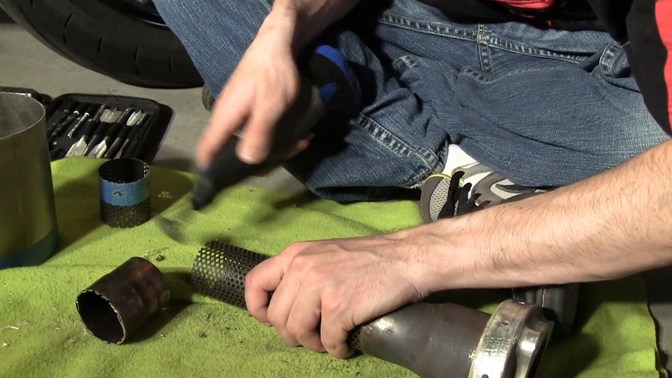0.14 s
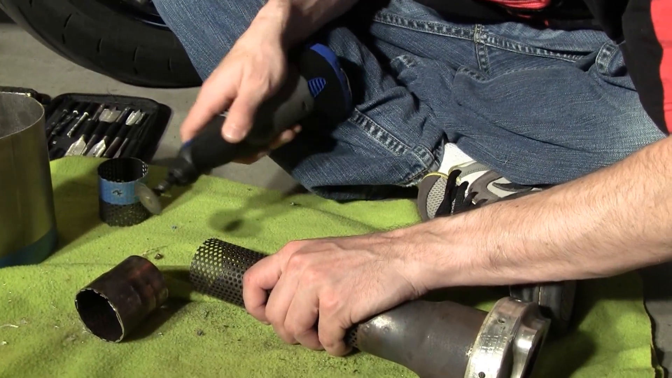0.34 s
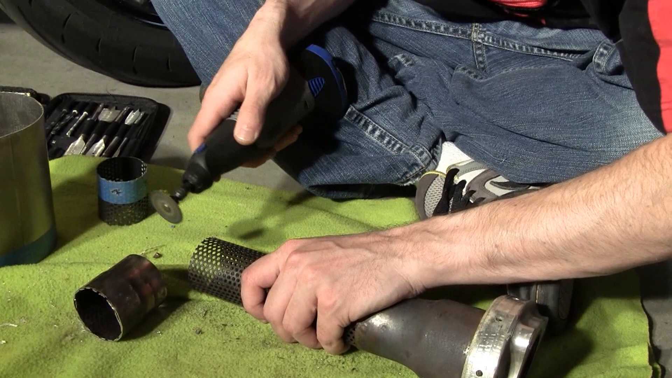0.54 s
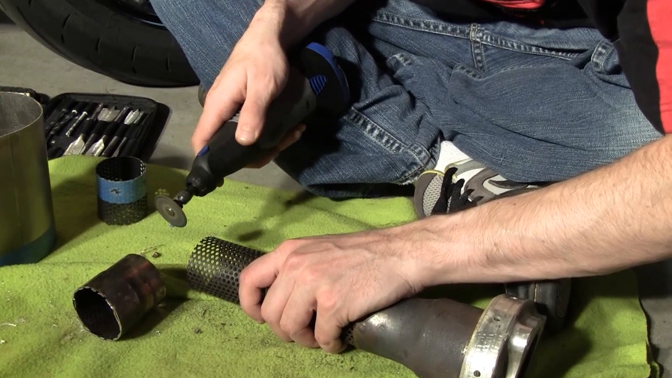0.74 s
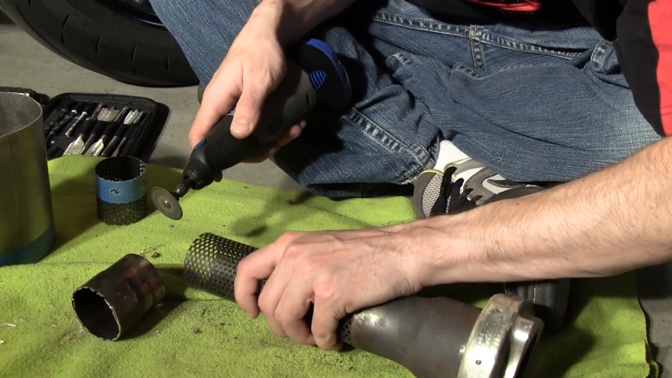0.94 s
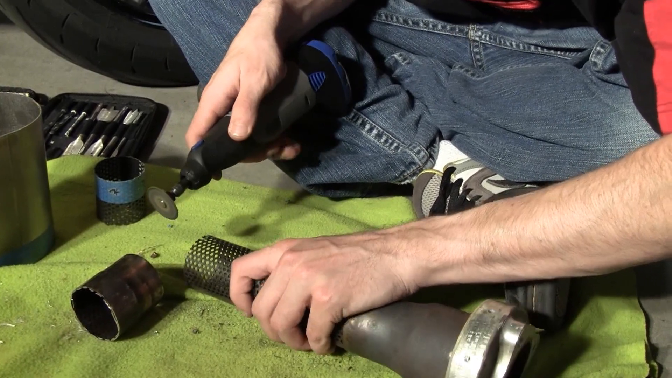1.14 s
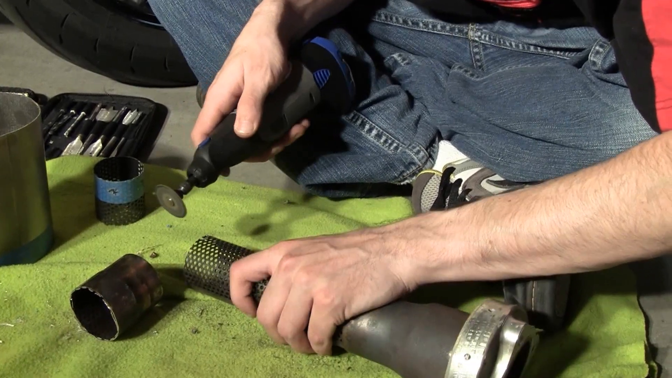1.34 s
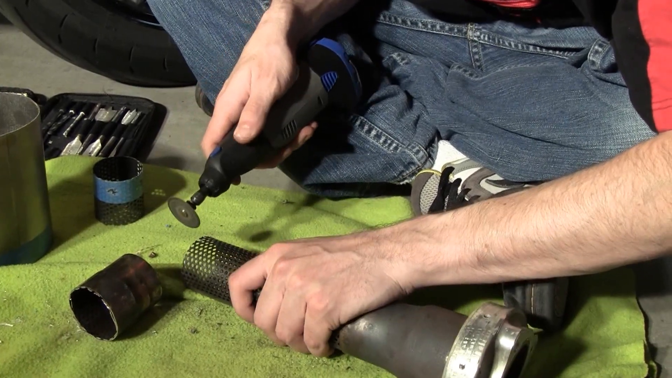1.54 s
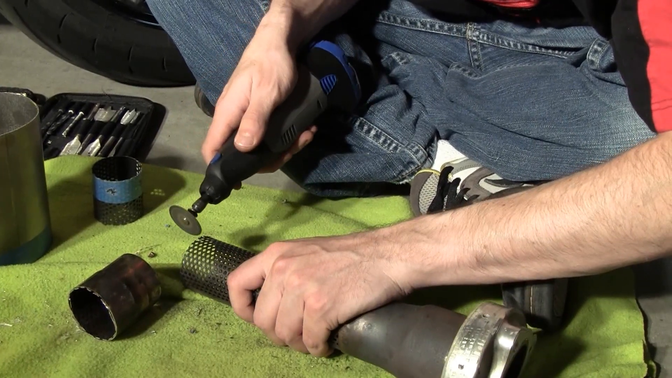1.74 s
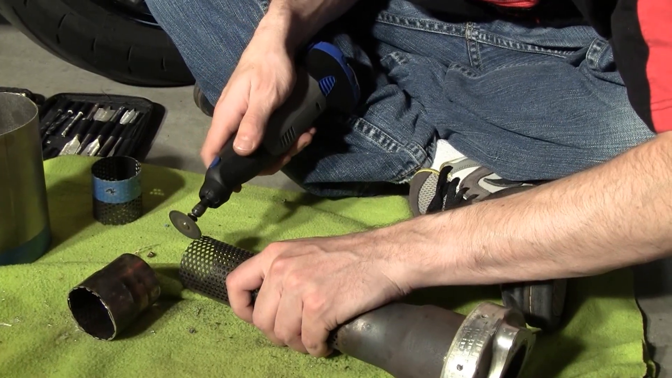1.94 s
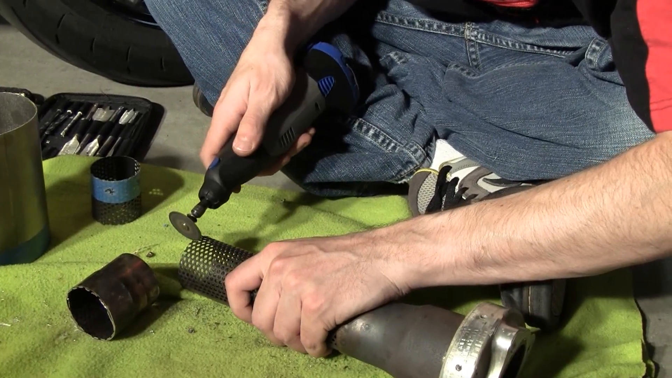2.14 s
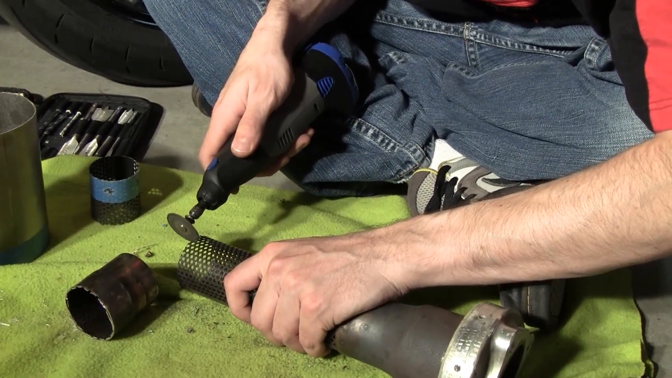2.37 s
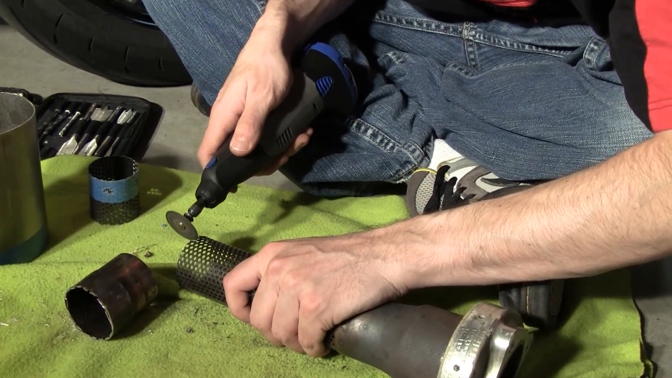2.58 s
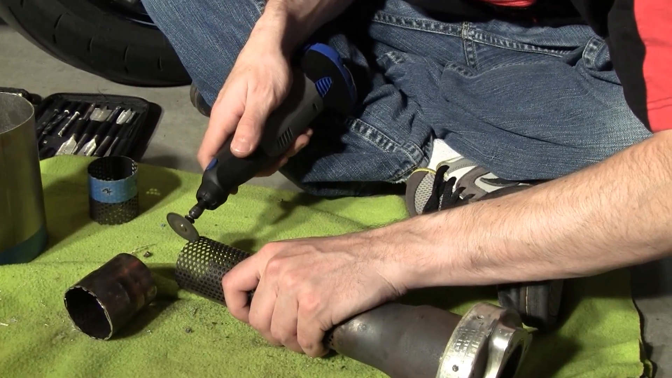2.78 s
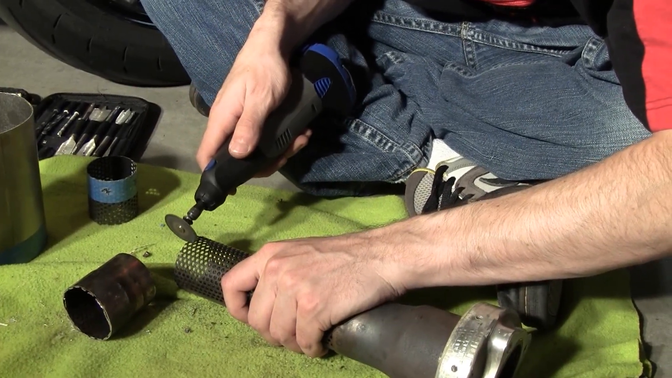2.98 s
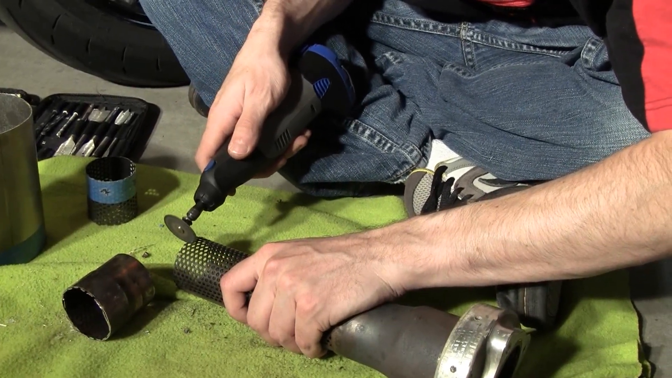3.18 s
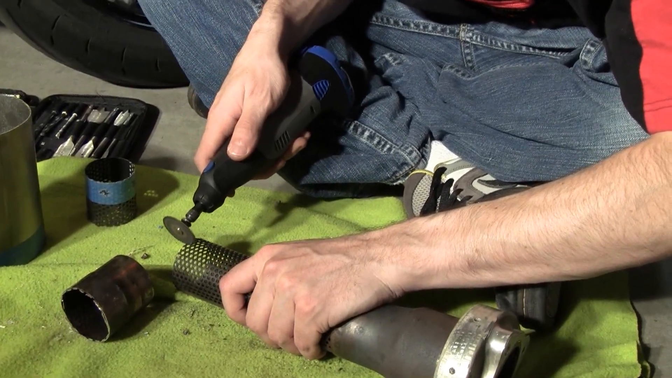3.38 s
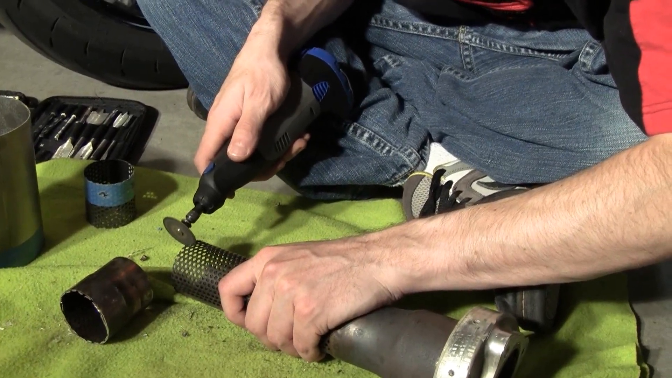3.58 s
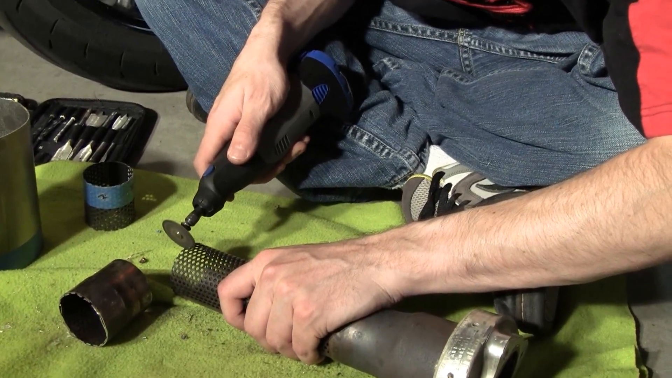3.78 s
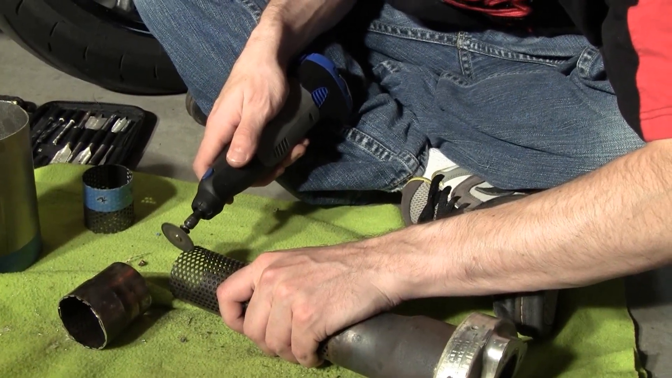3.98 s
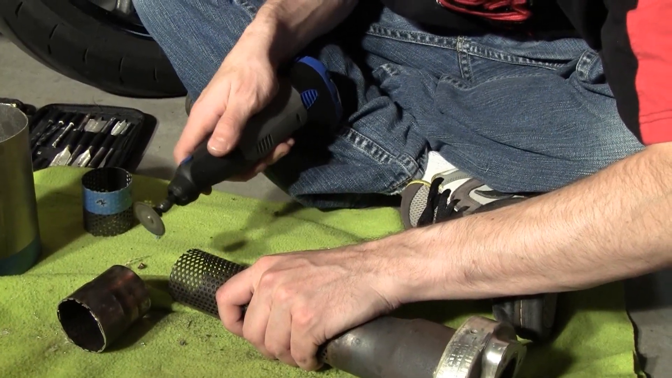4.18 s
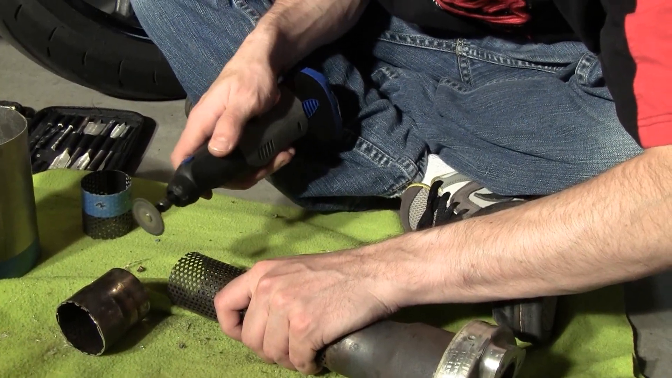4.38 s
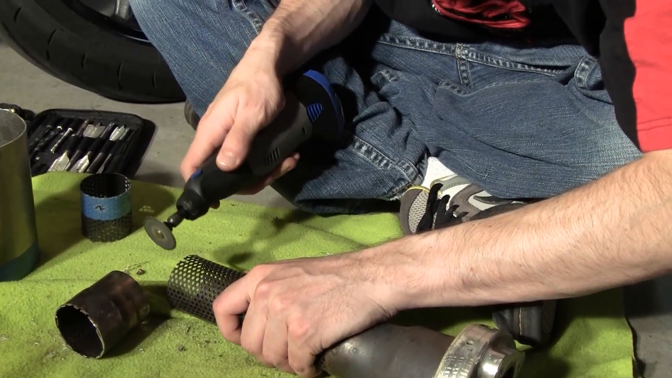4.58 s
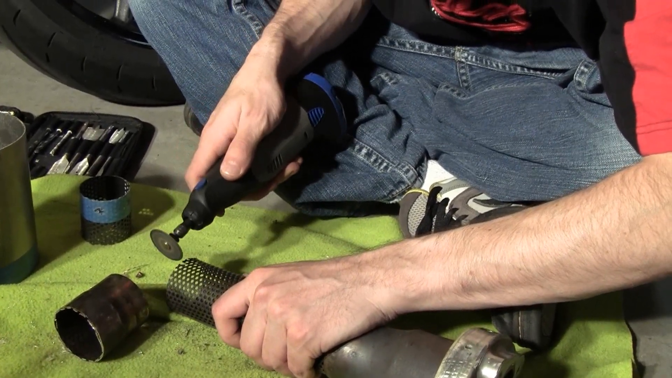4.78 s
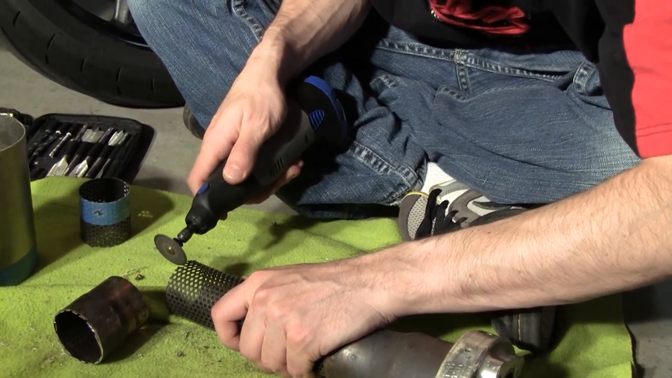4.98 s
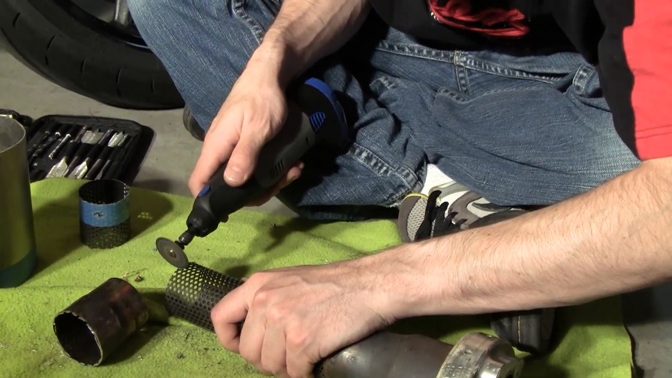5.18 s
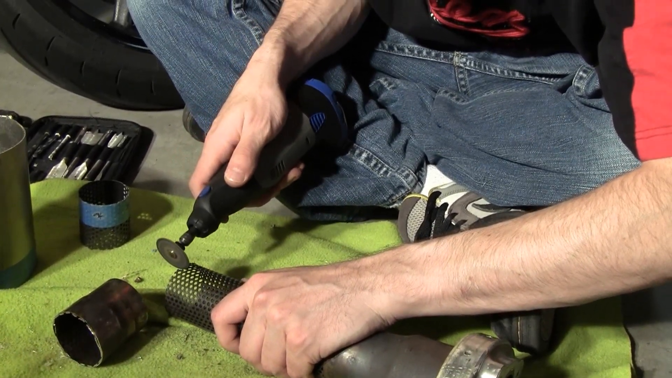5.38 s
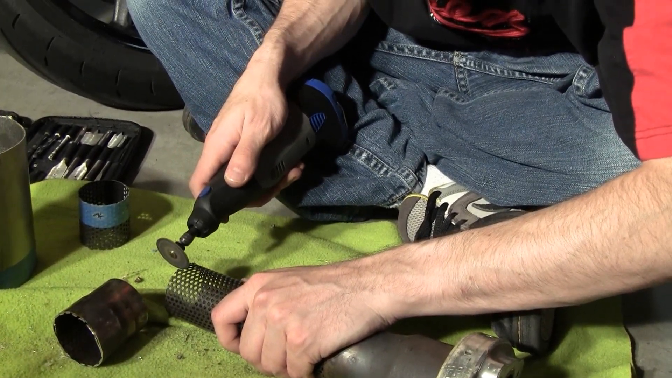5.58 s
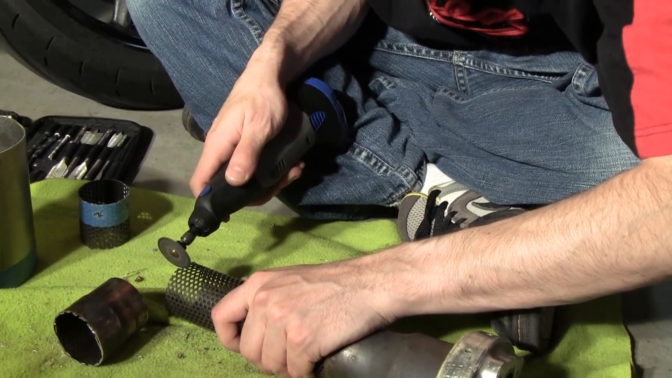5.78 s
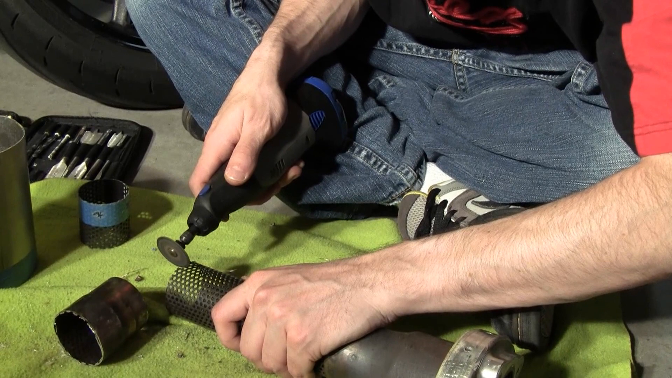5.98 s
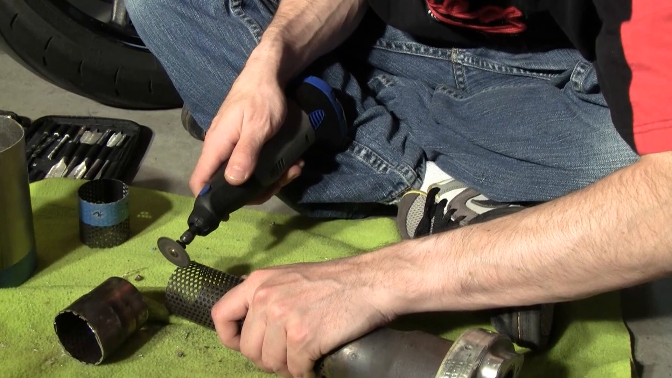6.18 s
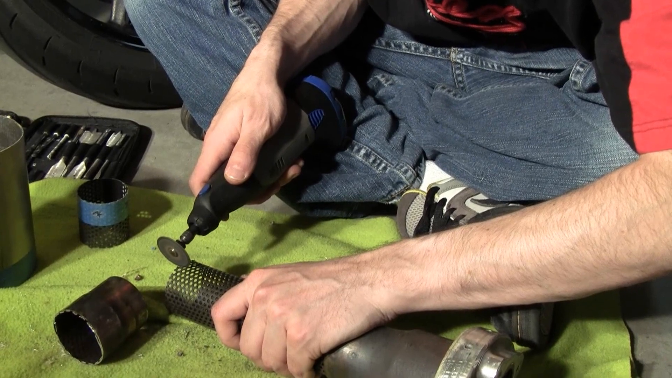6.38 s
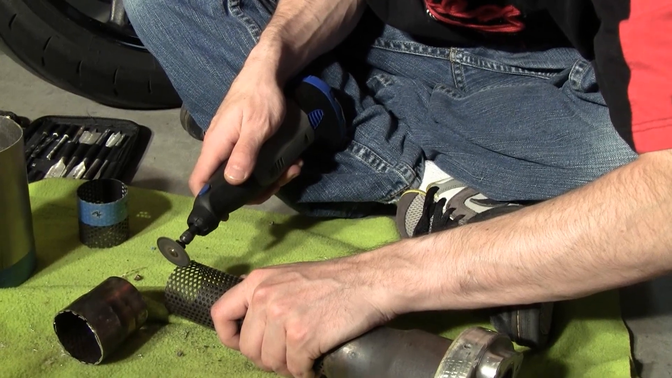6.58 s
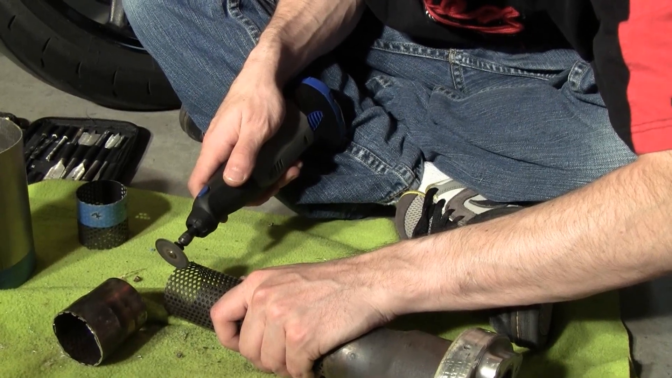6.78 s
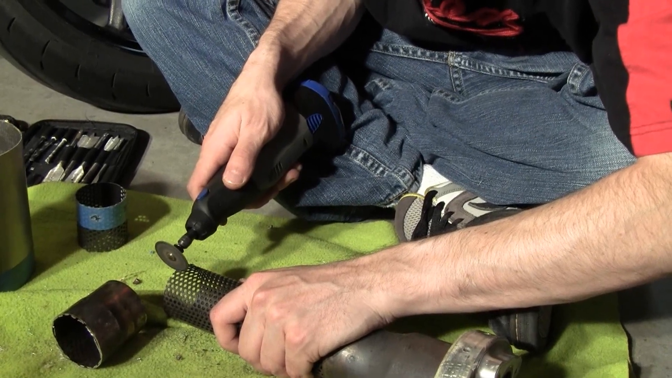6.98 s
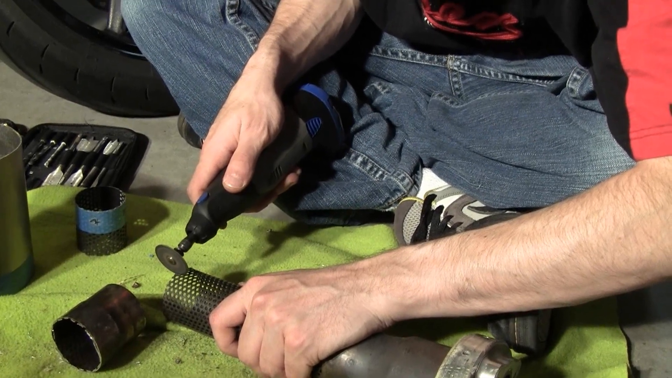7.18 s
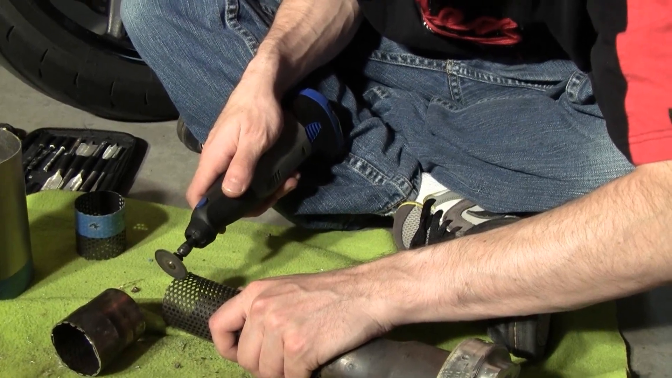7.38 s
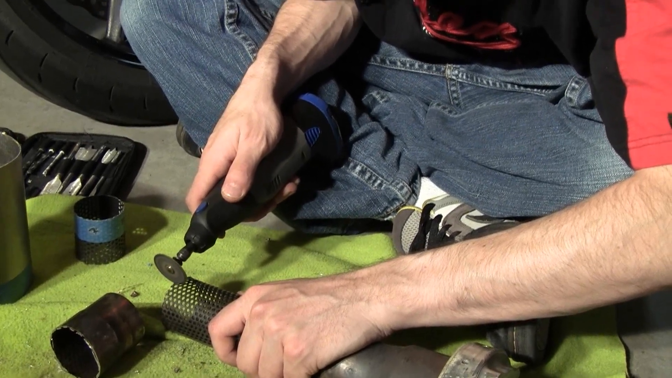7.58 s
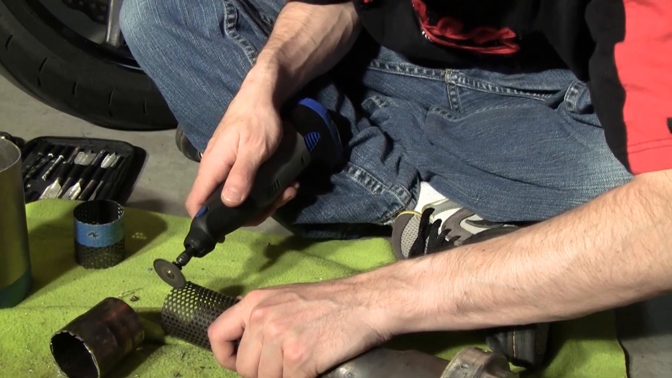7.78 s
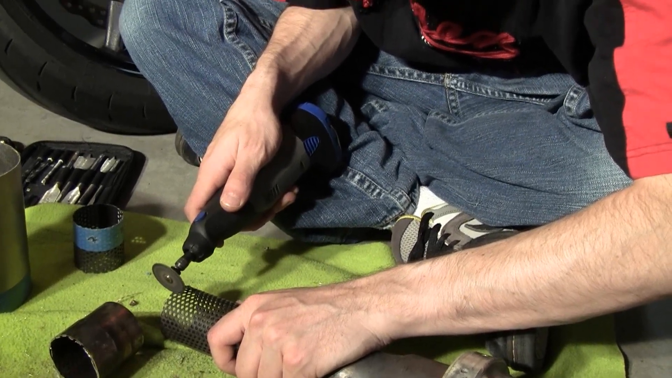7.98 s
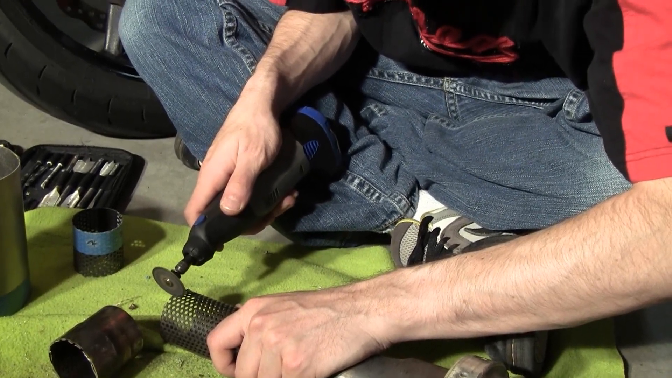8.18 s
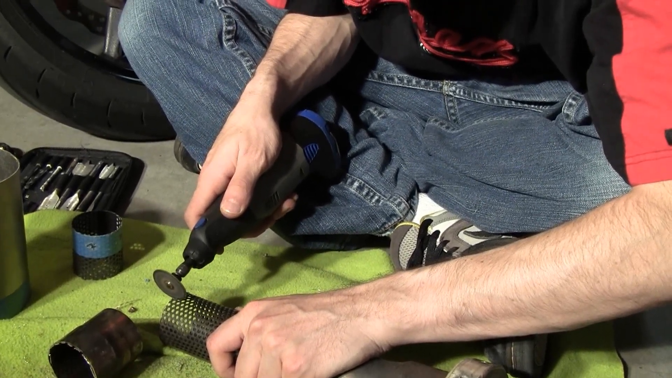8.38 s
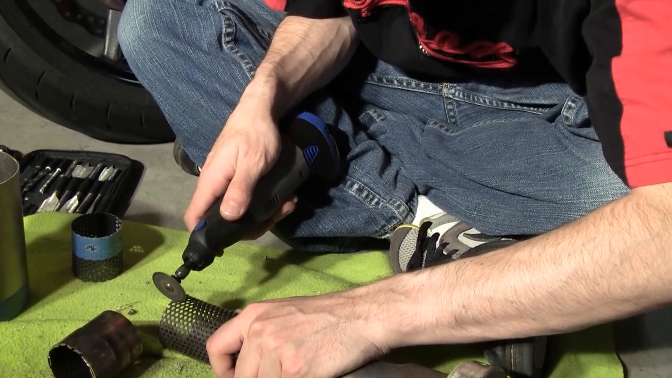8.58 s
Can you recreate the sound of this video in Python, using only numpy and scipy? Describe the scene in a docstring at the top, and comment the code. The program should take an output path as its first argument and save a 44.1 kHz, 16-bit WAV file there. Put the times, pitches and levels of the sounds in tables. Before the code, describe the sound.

A handheld rotary tool snaps on and races up to a steady, buzzy whine with rushing air. Its wheel cuts into a steel exhaust pipe twice: first the motor bogs abruptly, with fluttering gritty chatter and short screeches, then recovers. The second cut begins as a ringing skim and sinks gradually into coarse, hissing rasp, still going at the end. Close and dry, with slight garage reflections.

```python
"""Rotary tool cutting a steel pipe

A handheld rotary tool is switched on in a garage, spins up and twice cuts an exhaust pipe with an abrasive wheel.
The motor whines on multiples of its shaft speed, which sags during each cut and climbs between them.
Grit on the rim excites the pipe's resonances in nearly the same pattern on every turn;
deep in the cut, random forces replace much of that pattern and the sound turns to a rasp."""
import sys
import numpy as np
from scipy import signal
from scipy.fft import rfft, irfft, next_fast_len
from scipy.io import wavfile
from scipy.ndimage import uniform_filter1d

SR = 44100
rng = np.random.default_rng(int(sys.argv[2]) if len(sys.argv) > 2 else 0)


def store_wav(level_fs):
    """Save 16-bit WAV to argv[1]."""
    pcm = np.round(np.clip(np.atleast_2d(level_fs), -1, 1) * 32767)
    wavfile.write(sys.argv[1], SR, pcm.T.astype(np.int16))


N = 380583
TIME = np.arange(N) / SR

# spectrum of the garage air: (frequency [Hz], relative level [dB per Hz])
AMBIENCE = [(30, -33), (100, -6), (250, 2), (500, 0), (1000, -3.5), (2000, -10), (4000, -18), (8000, -29),
            (13000, -20), (15000, -50)]
# background hum, before its share of the level curve: (frequency [Hz], level [dB])
HUM = [(120, -52), (278, -43), (774, -51.5), (1243, -55)]
# thin high chirps before the motor starts: (time [s], length [s], frequency [Hz], level of the fundamental [dB])
CHIRPS = [(0.0, 0.06, 4135, -54), (0.072, .17, 4140, -53), (0.151, 0.049, 4255, -42.5)]
# level curve that turns both motor and background hum down during the cuts: (time [s], level [dB])
LEVEL_CURVE = [(.7, -6), (1.0, -3), (1.55, -4), (2.1, -6), (2.35, -15.5), (2.62, -28.5), (2.95, -13.5),
               (3.25, -21.5), (3.6, -18.5), (4.15, -16.5), (4.62, -2.5), (5.15, -4.5), (5.35, -13),
               (5.65, -8.5), (5.8, -16.5), (6.3, -20), (6.85, -21.5), (7.05, -24.5), (8.63, -23)]
# the power switch: (time [s], overall level [dB])
SWITCH = (.2555, -22)
# modes the switch strikes: (frequency [Hz], relative level [dB], 60 dB decay time [s])
SWITCH_MODES = [(800, 0.5, 0.0295), (1640, -3, 0.03), (3830, -19, 0.0166), (6000, -12, 0.0125),
                (8200, -6, .008), (10300, 6, 0.0076)]

FULL_SPEED = 356  # turns per s
# the freed motor runs up: (time [s], starting speed [turns per s], speed approached [turns per s])
RUN_UPS = [(.2555, 123.2, 357.2), (4.16, 209.9, 353.2)]
# time constant of the last stretch [s], and how much air drag steepens the first
SPIN_UP_S, AIR_DRAG = .319, .92
# the shaft bogs down in the first and the second cut: (time [s], speed [turns per s])
FIRST_SAG = [(2.15, 357.4), (2.37, 337.1), (2.41, 300.8), (2.48, 283.3), (2.56, 185.6), (2.61, 187.0),
             (2.66, 165.3), (2.74, 217.5), (2.77, 229.5), (2.83, 232.0), (2.94, 258.3), (3.0, 260.1),
             (3.07, 252.9), (3.12, 223.1), (3.25, 185.3), (3.38, 188.2), (3.47, 206.8), (3.53, 195.2),
             (3.6, 207.5), (3.66, 197.1), (3.73, 210.3), (3.79, 198.5), (4.1, 198.2), (4.16, 210.6)]
SECOND_SAG = [(5.19, 349.1), (5.28, 345.8), (5.41, 325.1), (5.65, 329.7), (5.85, 300.5), (6.07, 294.7),
              (6.21, 260.9), (6.41, 274.8), (6.52, 275.4), (6.69, 241.6), (6.82, 235.1), (7.03, 200.5),
              (7.24, 205.5), (7.34, 194.1), (7.37, 202.1), (7.55, 185.0), (7.8, 181.9), (7.87, 192.8),
              (8.01, 191.2), (8.05, 183.1), (8.12, 195.9), (8.31, 178.3), (8.38, 187.5), (8.47, 173.5),
              (8.54, 172.6), (8.63, 179.4)]

# the motor's voices: (level at full speed [dB], slope [dB per octave of speed], share of the level curve)
UNBALANCE_LAW = (-23.5, 10.5, 0.81)
WHINE_LAW = (-14.5, 6.5, 0.93)
AIR_LAW = (-17, 16, 0.84)
# the unbalance hum cancels at one speed: (speed [turns per s], width [turns per s], loss [dB])
HUM_NULL = (339, 7, 16)
# shaft multiples from fan blades and commutator: (multiple, relative level [dB])
WHINE = [(1, -2), (2, -4), (3, 0), (4, 4), (5, -1), (6, 1.5), (7, -5.5), (8, -3.5), (9, -0.5), (10, -4.5),
         (11, -4), (12, -4.5), (13, -6.5), (14, -10.5), (15, -1), (16, -9.5), (17, -13), (18, -2),
         (19, -7.5), (20, -3), (21, -9), (22, -3.5), (23, -1.5), (24, -2), (25, -15.5), (26, -5),
         (27, -8.5), (28, -8.5)]
# resonances of the plastic housing: (frequency [Hz], width [Hz], boost or cut [dB])
HOUSING = [(852, 114, 10.5), (925, 26, -0.5), (1045, 15, 8), (1370, 16, 7), (1843, 14, 10), (1985, 18, 2),
           (2108, 5.3, -4), (2390, 33, 7.5), (2853, 17, 6), (2980, 630, 7.5), (2973, 19, -1.5),
           (3910, 210, 8.5), (4460, 22, 13), (4760, 310, 15.5), (6400, 100, 7)]
WHINE_ATTACK_S = 0.11  # the whine builds up this long after the switch
# cooling air and brush hiss: (frequency [Hz], relative level [dB per Hz])
AIR = [(40, -28), (100, -15.5), (280, -4.5), (470, -13), (800, -4.5), (1500, -1), (3000, 0), (4600, 4.5),
       (6000, 1), (8000, 0.5), (11000, -3.5), (13500, -17.5), (15500, -33)]

# wheel on the pipe: (start [s], end [s], grinding level [dB], base pipe ring relative to it [dB],
# least roughness [0-1])
CUTS = [(2.152, 4.155, -17.5, -8, .22), (5.204, 8.7, -18, -8, .02)]
# resonances of the steel pipe and wheel: (frequency [Hz], nominal width [Hz], relative level [dB])
PIPE = [(410, 42, -17), (810, 180, -12), (1350, 550, -12), (1746, 334, -4.5), (2710, 630, -10.5),
        (3332, 230, -7.5), (4073, 295, -3), (4564, 335, 1.5), (5700, 530, -2.5), (7380, 590, 8.5),
        (8280, 1350, 7.5), (9600, 2100, 7), (11970, 1100, 2), (13040, 970, -3.5), (14530, 510, -4.5)]
# the hand eases off and the wheel nearly leaves the groove: (time [s], half length [s], loss [dB])
EASINGS = [(2.16, 0.042, 3.5), (2.294, 0.011, 4), (2.56, 0.038, 3), (2.734, 0.046, 7.5), (2.878, 0.054, 6),
           (3.137, 0.021, 0), (3.432, 0.034, 3), (3.642, 0.057, 1.5), (5.276, 0.021, 3), (5.45, 0.031, 6.5),
           (5.51, 0.023, 20), (5.67, .02, 2), (5.78, 0.024, 4), (5.904, 0.0084, 9), (6.246, 0.039, 5.5),
           (6.693, 0.082, 1.5), (7.36, 0.04, 3.5), (8.104, 0.022, 1.5)]
# chatter bursts, where the pipe's ring and the motor's whine stand out:
# (time [s], half length [s], nominal boost [dB])
CHATTER_BURSTS = [(2.41, 0.078, 4), (3.04, 0.059, 2), (3.48, 0.031, 7), (3.6, 0.032, 5), (3.72, 0.075, 4.5),
                  (3.99, 0.17, 5), (5.6, 0.031, 0.5), (5.95, 0.025, 9), (6.48, 0.094, 5), (6.85, .05, 6)]
# share of a burst's boost that reaches the pipe's ring and the whine
BURST_RING, BURST_WHINE = 0.43, 0.97
# the lower the speed in a cut, the more the wheel rasps: roughness [0-1] at half speed, power of the law
ROUGH_AT_HALF_SPEED, ROUGH_POWER = 0.69, 1
SKIM_SAG = 0.099  # up to this sag, as a share of full speed, the wheel only skims
# the pipe rings most under a firm, even bite: (sag [share of full speed], width [same], boost [dB])
FIRM_BITE = (0.3, 0.14, 3.85)
# mean level of the top sizzle, and its greatest spread as the wheel skims [dB]
SIZZLE_DB, SIZZLE_WANDER_DB = -5, 2.5
# a skimming wheel touches unevenly: greatest spread of its ring [dB], touches per s
STUTTER_DB, STUTTER_PER_S = 3.0, 28
GRAIN_MEMORY = .955  # share of the rim's grain pattern that survives a turn
# the pinched wheel screeches: (time [s], length [s], frequency [Hz], level [dB])
SCREECHES = [(2.403, .08, 8000, -31), (3.197, 0.23, 8650, -32.5), (5.66, 0.072, 8300, -24.5),
             (5.94, 0.13, 8450, -28)]
# the tool is brought back to the pipe: (time [s], level before the soft onset [dB], frequency [Hz],
# 60 dB decay time [s])
KNOCK = (5.113, -17, 820, .035)

# difference between the microphone ports: (frequency [Hz], nominal side minus mid [dB])
WIDTH = [(60, -15), (300, -11.5), (1000, -17), (2500, -25), (4500, -10), (6000, -14.5), (7500, -12.5),
         (10000, -2.5), (15000, -4)]
CUTOFF_HZ = 16000


def from_db(db):
    """Logarithmic level: decibels to amplitude gain."""
    return 10 ** (np.asarray(db) / 20)


def rms_one(x):
    """Power normalisation: scale to an rms of 1."""
    return x / np.sqrt(np.mean(x ** 2) + 1e-20)


def in_time(rows):
    """Linear interpolation: the columns of a curve table at every sample."""
    s, *columns = np.transpose(rows)
    return [np.interp(TIME, s, c) for c in columns]


def at_hz(points, hz):
    """Spectral envelope: gain of a table joined on a log-frequency axis."""
    f, db = np.transpose(points)
    return from_db(np.interp(np.log(hz), np.log(f), db))


def bell(x, centre, width):
    """Lorentzian resonance: power response, 1 on top and half at half a width to either side."""
    return 1 / (1 + (2 * (x - centre) / width) ** 2)


def colour(x, gain_at):
    """Linear filtering: multiply the spectrum of x by a gain given as a function of frequency."""
    size = next_fast_len(N + 2000, True)
    hz = np.maximum(np.fft.rfftfreq(size, 1 / SR), 1)
    return irfft(rfft(x, size) * gain_at(hz), size)[..., :N]


def gate(start, end, fade):
    """Amplitude envelope: 1 between two times, with straight fades outside them."""
    return np.clip(np.minimum(TIME - start, end - TIME) / fade + 1, 0, 1)


def swells(rows):
    """Gaussian envelopes: summed bumps in dB, one for each (time, half length, dB)."""
    return sum(db * np.exp(-((TIME - s) / length) ** 2) for s, length, db in rows)


def drift(rate):
    """Slow random modulation of rms 1: chance values joined at this rate, held after the last."""
    knots = rng.standard_normal(4000)
    return rms_one(np.interp(TIME * rate, np.arange(len(knots)), knots))


def per_turn(turns, memory, size=200):
    """Cyclic excitation of rms 1: a texture read round the shaft, each turn keeping a share of the last."""
    keep = np.clip(memory, 0, .998)
    fresh = rng.standard_normal((3200, size))
    # the first 400 turns let the texture settle
    texture = signal.lfilter([1], [1, -keep], fresh, axis=0)[400:].ravel()
    # read at twice the sample rate to limit aliasing
    place = np.interp(np.arange(2 * N) / 2, np.arange(N), turns) * size
    reading = np.interp(place, np.arange(len(texture)), texture)
    return rms_one(signal.resample_poly(reading, 1, 2))


def background():
    """Superposition: filtered noise for air, sines for hum, and chirps of three harmonics."""
    # the air sinks over two seconds from the switch
    air_db = -46 - 9 * np.clip((TIME - SWITCH[0]) / 2.0, 0, 1)
    air = from_db(air_db) * rms_one(colour(rng.standard_normal(N), lambda hz: at_hz(AMBIENCE, hz)))
    hum = sum(from_db(db) * np.sqrt(2) * np.sin(2 * np.pi * (hz * TIME + rng.random())) for hz, db in HUM)
    hum = hum * from_db(0.7 * in_time(LEVEL_CURVE)[0])
    chirps = 0
    for start, length, hz, db in CHIRPS:
        phase = 2 * np.pi * hz * TIME + 0.5 * drift(90)
        tone = np.sin(phase) + 0.16 * np.sin(2 * phase) + 0.21 * np.sin(3 * phase)
        chirps = chirps + from_db(db) * gate(start, start + length, fade=.004) * tone
    return air + hum + chirps


def switch(scrape_s=0.0081):
    """Impulsive excitation: the slide switch snaps over and the housing's modes decay freely."""
    start, level_db = SWITCH
    age = np.maximum(TIME - start, 0)
    modes = sum(from_db(db - 60 * age / t60) * np.sin(2 * np.pi * hz * age) for hz, db, t60 in SWITCH_MODES)
    scrape = colour(rng.standard_normal(N), lambda hz: bell(hz, 4300, 15000) * hz / (hz + 600))
    snap = from_db(-1.5) * (age > 0) * np.exp(-age / scrape_s) * scrape
    return from_db(level_db) * (modes + snap)


def shaft_speed():
    """Speed curve: a run-up law when freed, tabled speeds while cutting, corners smoothed."""
    speed = np.full(N, RUN_UPS[0][1])
    for (start, slow, top), sag in zip(RUN_UPS, (FIRST_SAG, SECOND_SAG)):
        left = np.exp(-np.maximum(TIME - start, 0) / SPIN_UP_S)
        free = top - (top - slow) * left / (1 + AIR_DRAG * (1 - slow / top) * (1 - left))
        from_start = np.where(TIME < sag[0][0], free, in_time(sag)[0])
        speed = np.where(TIME < start, speed, from_start)
    return uniform_filter1d(speed, size=900)


def voice_db(law, speed):
    """Power law of speed: level of one motor voice, plus its share of the level curve."""
    full_db, db_per_octave, share = law
    return full_db + db_per_octave * np.log2(speed / FULL_SPEED) + share * in_time(LEVEL_CURVE)[0]


def whine(turns, speed, flutter_rate=10, dulling_db=5.5, evenness=1.0, count=42):
    """Source and filter: shaft multiples glide through housing resonances; the sum is evened out to rms 1."""
    multiple, order_db = np.transpose(WHINE)
    coarse, speed = TIME[::32], speed[::32]
    # each multiple swells and fades at random, more at low speed
    flutter_db = 2.2 + 5 * np.maximum(1 - speed / FULL_SPEED, 0)
    out, power = 0, 0
    for k in range(2, count):
        boost_db = sum(db * bell(k * speed, centre, width) for centre, width, db in HOUSING)
        # a slow motor loses its high multiples first
        dull_db = dulling_db * np.log2(speed / FULL_SPEED) * max(k / 5 - 1, 0)
        place = coarse * flutter_rate + rng.random()
        wander = np.interp(place, np.arange(400), rng.standard_normal(400))
        # the highest multiples die away into the hiss
        fade_db = -.9 * max(k - len(WHINE), 0)
        base_db = np.interp(k, multiple, order_db)
        gain = from_db(base_db + boost_db + dull_db + fade_db + flutter_db * wander)
        out = out + np.interp(TIME, coarse, gain) * np.sin(2 * np.pi * (k * turns + rng.random()))
        power = power + gain ** 2 / 2
    return rms_one(out / np.interp(TIME, coarse, np.sqrt(power) ** evenness))


def brush_sparks(turns, speed):
    """Amplitude modulation: as the motor gains speed, brush noise sparks and rattles once a turn."""
    gain_in_speed = np.gradient(uniform_filter1d(speed, size=4000)) * SR / FULL_SPEED
    pull = np.clip(gain_in_speed, 0, 1) * speed / FULL_SPEED
    sparks = rng.standard_normal(N) * from_db(7 * np.cos(2 * np.pi * turns) + 3 * drift(120))
    response = lambda hz: (bell(hz, 1220, 660) + 0.3 * bell(hz, 4200, 6700)) * hz / (hz + 500)
    return from_db(-31.5) * pull * rms_one(colour(sparks, response))


def motor(turns, speed):
    """Rotating source: unbalance hum, whine, and a rush of air and brushes that grows steeply with speed."""
    null_hz, null_width, null_db = HUM_NULL
    hum_db = voice_db(UNBALANCE_LAW, speed) - null_db * bell(speed, null_hz, null_width)
    hum = from_db(hum_db) * np.sqrt(2) * np.sin(2 * np.pi * turns)
    # the rotor rattles in its bearings, more below full speed, and roughens the high multiples
    play = (.0025 + .015 * (1 - speed / FULL_SPEED)) * drift(400)
    attack = np.clip((TIME - SWITCH[0]) / WHINE_ATTACK_S, 0, 1) ** 2
    whine_db = voice_db(WHINE_LAW, speed) + BURST_WHINE * swells(CHATTER_BURSTS)
    tones = attack * from_db(whine_db) * whine(turns + play, speed)
    # the brushes scrape the same commutator bars on every turn
    rush = rng.standard_normal(N) + from_db(0.5) * per_turn(turns, memory=0.93)
    rush = rush * (1 + .6 * np.cos(2 * np.pi * turns)) * from_db(drift(40))
    air = from_db(voice_db(AIR_LAW, speed)) * rms_one(colour(rush, lambda hz: at_hz(AIR, hz)))
    air = air + brush_sparks(turns, speed)
    running = np.clip((TIME - SWITCH[0]) / 0.0041, 0, 1)
    return running * (np.sqrt(attack) * hum + tones + air)


def grit(turns, rough, runout_db=5.0, chatter_db=-1.0):
    """Contact force: a slowly wearing grain pattern plus fresh fractures, hardest once a turn by runout."""
    pattern = np.sqrt(1 - rough) * per_turn(turns, memory=GRAIN_MEMORY)
    fractures = np.sqrt(rough) * rng.standard_normal(N)
    runout = runout_db * (0.5 - 0.1 * rough) * np.cos(2 * np.pi * turns)
    # deep in the groove the wheel bounces unevenly
    chatter = chatter_db * np.sqrt(rough) * drift(650)
    pressure = from_db(runout + chatter)
    pressure = pressure / np.sqrt(uniform_filter1d(pressure ** 2, size=2000))
    return (pattern + fractures) * pressure * from_db(1.3 * drift(50))


def pipe_response(hz):
    """Modal superposition: the pipe's resonances added in power, with steep skirts."""
    return np.sqrt(sum(from_db(db) ** 2 * bell(hz, centre, 1.05 * width) ** 2 for centre, width, db in PIPE))


def screeches(force, width_hz=600):
    """Resonant response: one mode of the pinched wheel rings out above the rasp."""
    out = 0
    for start, length, centre, db in SCREECHES:
        mode = rms_one(colour(force, lambda hz: bell(hz, centre, width_hz)))
        out = out + from_db(db) * gate(start, start + length, fade=0.11) * mode
    return out


def grinding(turns, speed, ring_edge_hz=6700, sizzle_edge_hz=11100):
    """Forced vibration: grit drives a low ring, a rasp and a top sizzle, rougher as the speed sags."""
    sag = np.maximum(1 - speed / FULL_SPEED, 0)
    skimming = sum(share * gate(start, end, fade=.008) for start, end, _, _, share in CUTS)
    depth = np.maximum(sag - SKIM_SAG, 0) / (.5 - SKIM_SAG)
    digging = ROUGH_AT_HALF_SPEED * depth ** ROUGH_POWER
    rough = np.clip(np.maximum(skimming, digging), 0, .92)
    cutting = sum(from_db(db) * gate(start, end, fade=0.012) for start, end, db, _, _ in CUTS)
    contact = from_db(-swells(EASINGS)) * cutting
    firm_sag, firm_width, firm_db = FIRM_BITE
    ring_db = sum(db * gate(start, end, fade=0.0066) for start, end, _, db, _ in CUTS)
    ring_db = ring_db + firm_db * bell(sag, firm_sag, firm_width) + BURST_RING * swells(CHATTER_BURSTS)
    ring_db = ring_db + STUTTER_DB * (1 - rough) ** 2 * drift(STUTTER_PER_S)
    sizzle_db = SIZZLE_DB + SIZZLE_WANDER_DB * (1 - rough) ** 2 * drift(22)
    # the rim's coarse bumps drive the low ring, its fine grains the treble
    coarse, fine = grit(turns, .72 * rough), grit(turns, rough)
    above = lambda hz, edge: 1 / (1 + (edge / hz) ** 30)
    low_band = lambda hz: (1 - above(hz, ring_edge_hz)) * hz / (hz + 120)
    middle_band = lambda hz: above(hz, ring_edge_hz) - above(hz, sizzle_edge_hz)
    ring = rms_one(colour(coarse, lambda hz: pipe_response(hz) * low_band(hz)))
    rasp = rms_one(colour(fine, lambda hz: pipe_response(hz) * middle_band(hz)))
    sizzle = rms_one(colour(fine, lambda hz: pipe_response(hz) * above(hz, sizzle_edge_hz)))
    steel = from_db(ring_db) * ring + from_db(-1.95) * rasp + from_db(sizzle_db) * sizzle
    return contact * steel + screeches(fine)


def knock():
    """Damped free vibration: one short, dull ring with a soft onset."""
    start, level_db, hz, t60 = KNOCK
    age = np.maximum(TIME - start, 0)
    soft_contact = 1 - np.exp(-age / .003)
    return from_db(level_db - 60 * age / t60) * soft_contact * np.sin(2 * np.pi * hz * age)


def reflections(x, t60, size=16000):
    """Diffuse reverberation: convolve x with a dense, dying train of echoes of unit energy."""
    echoes = rng.standard_normal(size) * from_db(-60 * np.arange(size) / SR / t60)
    return signal.fftconvolve(x, echoes / np.sqrt(np.sum(echoes ** 2)))[:N]


def scene():
    """Direct and reflected sound: the tool is close; surfaces and walls reach the two ports differently."""
    speed = shaft_speed()
    # the shaft turns steadily at full speed and stumbles below it
    stumble = .0004 + .006 * np.maximum(1 - speed / FULL_SPEED, 0)
    turns = np.cumsum(speed * (1 + stumble * drift(60))) / SR
    direct = background() + switch() + motor(turns, speed) + grinding(turns, speed) + knock()
    mid = direct + from_db(-17) * reflections(direct, t60=.25)
    # the ports hear the direct sound a little out of phase, and the walls' echoes unalike
    phase_side = colour(direct, lambda hz: .45j * at_hz(WIDTH, hz))
    echo_side = colour(reflections(direct, t60=.2), lambda hz: .92 * at_hz(WIDTH, hz))
    side = phase_side + echo_side
    return np.array([mid + side, mid - side])


def record(dry):
    """Saturation and band limiting: peaks are rounded, then the treble is cut above CUTOFF_HZ."""
    top = 0.75
    rounded = top * np.tanh(dry / top)
    low_pass = signal.ellip(10, .1, 80, CUTOFF_HZ, fs=SR, output="sos")
    return signal.sosfilt(low_pass, rounded)


dry = scene()
out = record(dry)
store_wav(out)
```